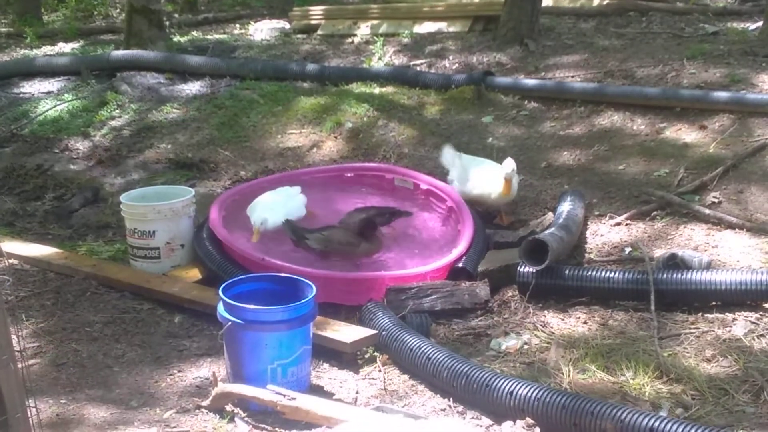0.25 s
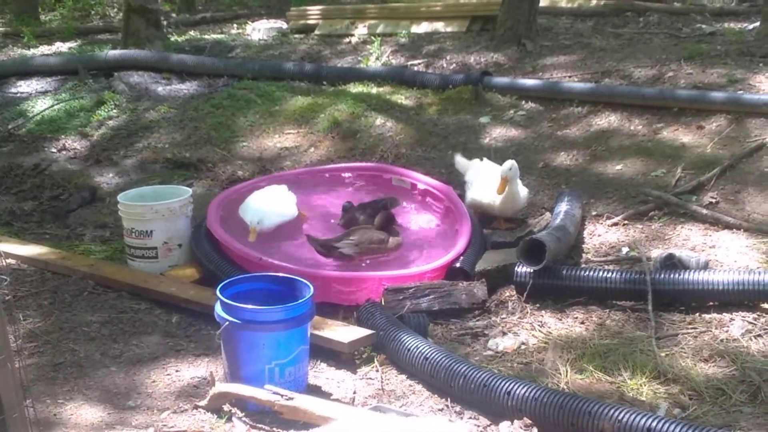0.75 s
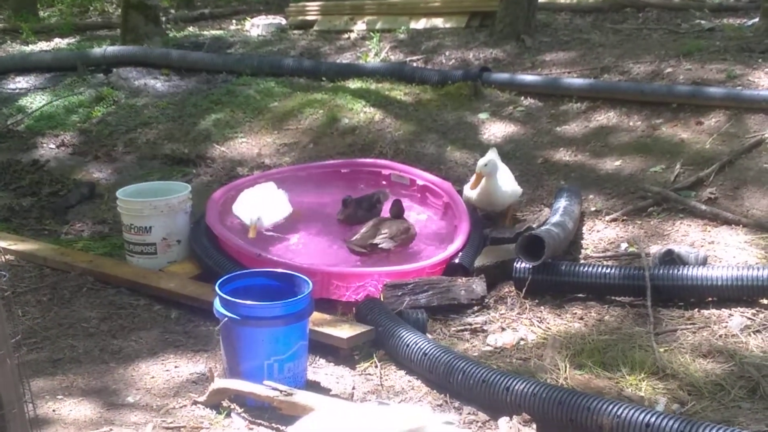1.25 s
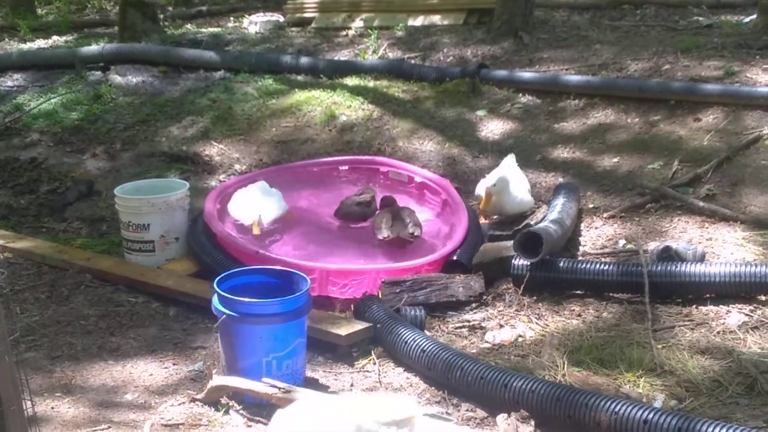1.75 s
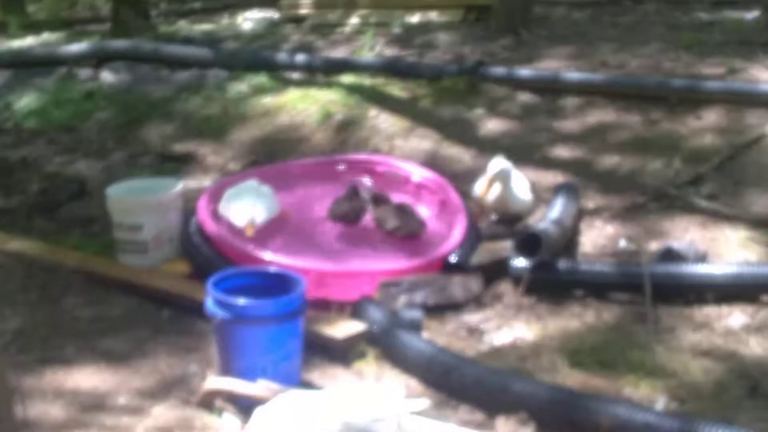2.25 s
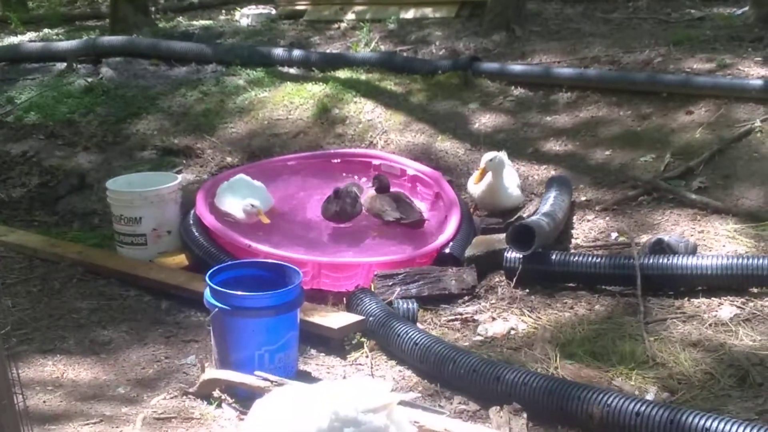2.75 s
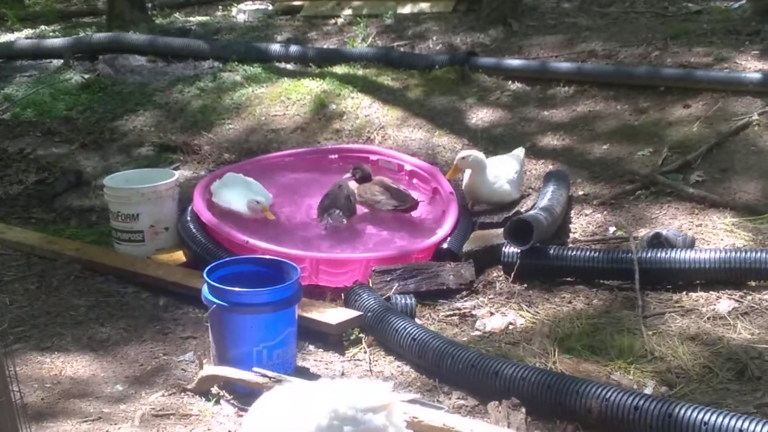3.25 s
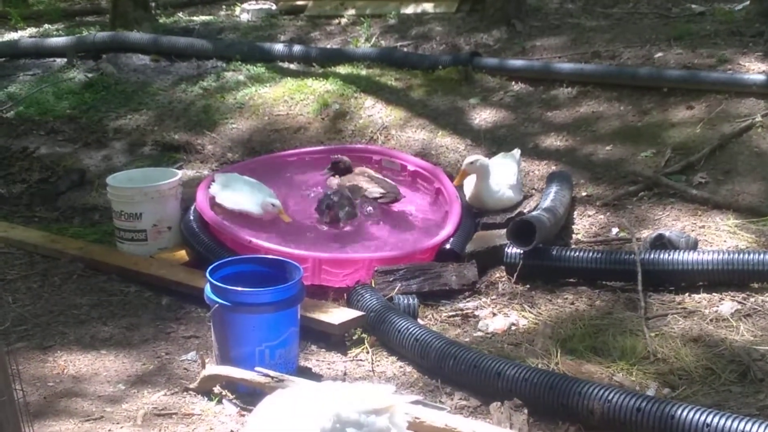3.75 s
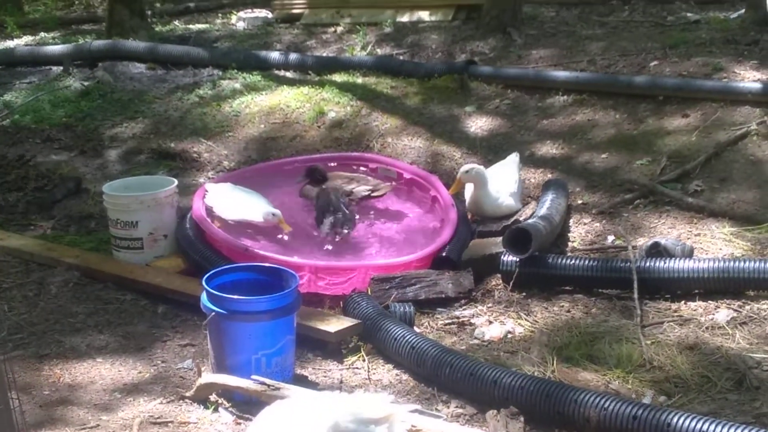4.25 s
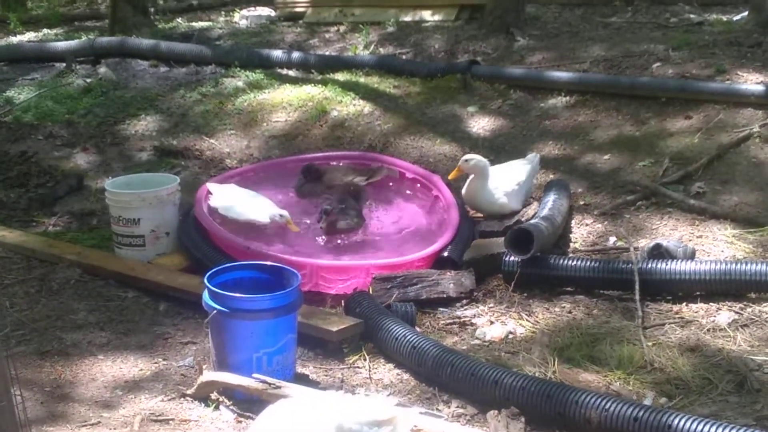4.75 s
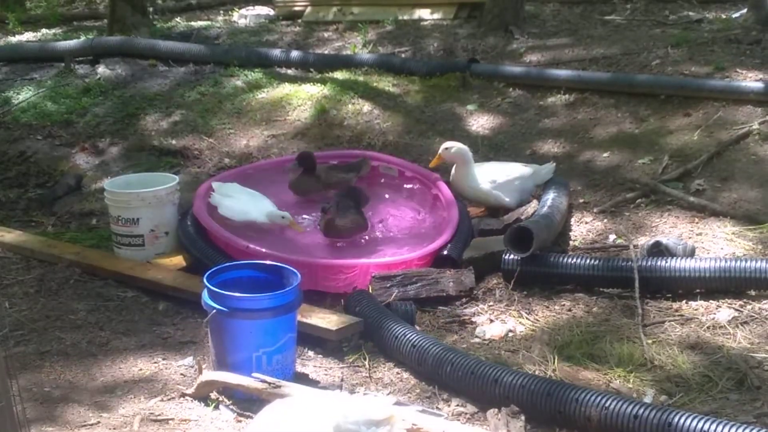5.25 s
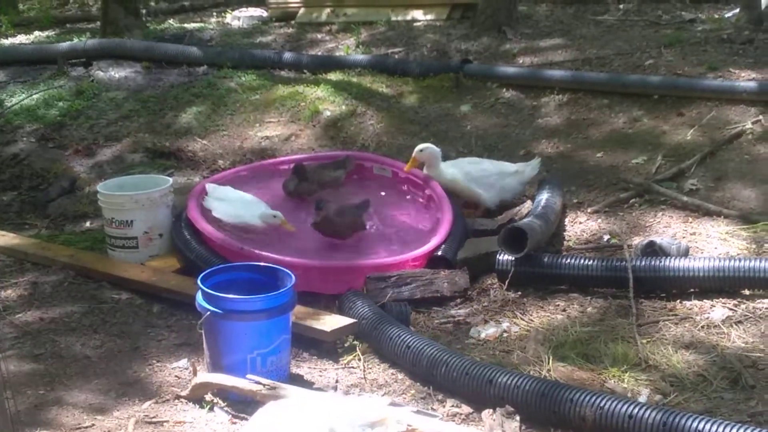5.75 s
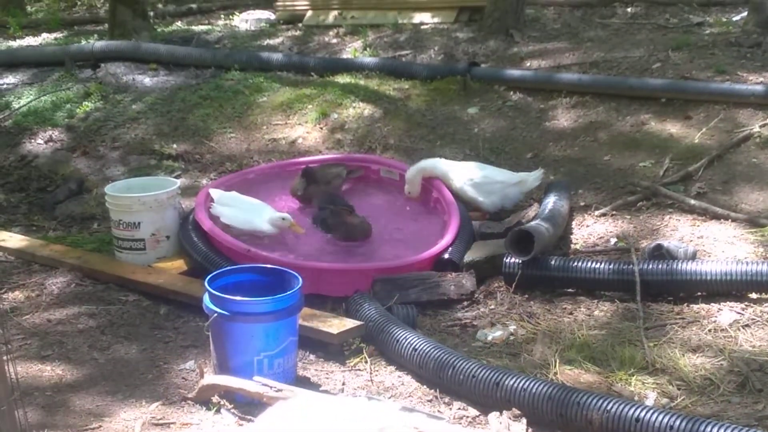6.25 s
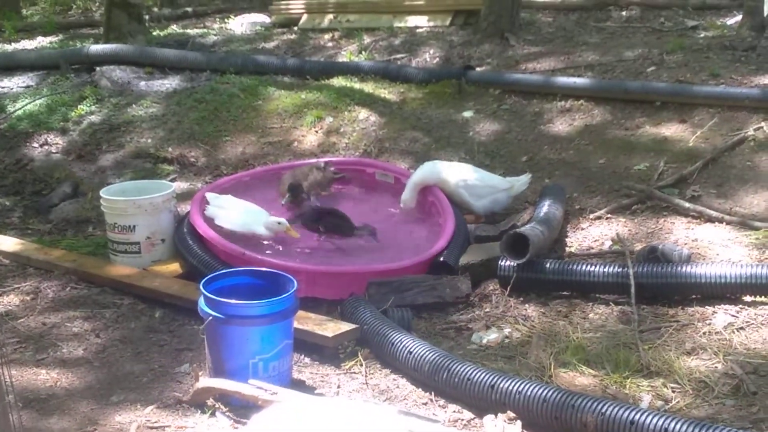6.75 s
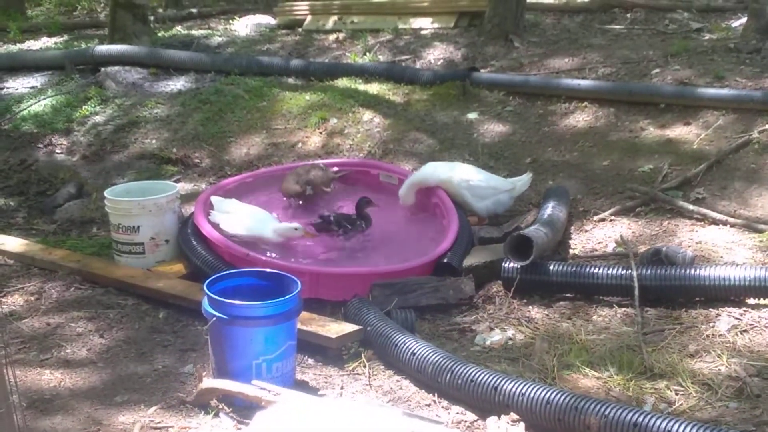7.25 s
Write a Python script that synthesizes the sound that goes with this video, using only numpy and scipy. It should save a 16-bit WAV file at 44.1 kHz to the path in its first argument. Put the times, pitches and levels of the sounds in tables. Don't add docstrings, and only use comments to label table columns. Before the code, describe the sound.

Ducks dabble and drip in a plastic pool while low clucks and grumbles mutter around, with two brief sharp squawks and small whistled chirps.

```python
import sys
import numpy as np
from scipy import signal
from scipy.fft import rfft, irfft, next_fast_len
from scipy.io import wavfile
from scipy.ndimage import uniform_filter1d, map_coordinates

SR = 44100
rng = np.random.default_rng(int(sys.argv[2]) if len(sys.argv) > 2 else 0)


def output_pcm(signal):
    pcm = np.clip(np.atleast_2d(signal).T, -1, 1) * 32767
    wavfile.write(sys.argv[1], SR, np.round(pcm).astype(np.int16))


def decibels_to_gain(level_db):
    exponent = np.asarray(level_db, float) / 20
    return 10 ** exponent


N = 331632


def unit(x):
    return x / np.sqrt(np.mean(x ** 2) + 1e-20)


def along(points, hz):
    f, v = np.transpose(points)
    return np.interp(np.log(hz + 1), np.log(f + 1), v)


def wobble(rate_hz):
    return map_coordinates(rng.standard_normal(int(N * rate_hz / SR) + 4), [np.arange(N) * rate_hz / SR])


def filtered(x, response):
    m = next_fast_len(N + SR // 2)
    return irfft(rfft(x, m) * response(np.fft.rfftfreq(m, 1 / SR)), m)[..., :N]


def resonances(modes, f):
    total = 0
    for k, (centre, width, db) in enumerate(modes):
        mode = 1j * f * width / (centre * centre - f * f + 1j * f * width)
        total = total + (-1) ** k * decibels_to_gain(db) * mode
    return total


def add(track, s, sound):
    part = track[round(s * SR):][:len(sound)]
    part += sound[:len(part)]


def stack(pitch_hz, modes, rough, count=8):
    shake = uniform_filter1d(rng.standard_normal((2, len(pitch_hz))), size=40) * 6
    phase = 2 * np.pi * np.cumsum(pitch_hz * (1 + 0.3 * rough * shake[0])) / SR
    voice = 0
    for k in range(1, count + 1):
        gain = np.abs(resonances(modes, k * pitch_hz))
        voice = voice + gain * np.sin(k * phase + (k - 1) ** 2)
    return voice * (1 + rough * shake[1])


def placed(x, lag_s):
    return filtered(x, lambda f: np.exp(-1j * np.pi * f * lag_s * np.array([[1], [-1]])))


# (frequency [Hz], first port louder [dB], first port late [rad])
SHADE = [(850, 0, .7), (1600, -4, 1.65), (2450, -4, .15), (3000, 9, .9), (3500, 4.5, 1.4), (4500, 0, 2.4),
         (5500, 0, 2.6)]


def shaded(x):
    hz, louder_db, late_rad = np.transpose(SHADE)
    sign = np.array([[.5], [-.5]])

    def response(f):
        gain = decibels_to_gain(sign * np.interp(f, hz, louder_db))
        turn = np.exp(-1j * sign * np.interp(f, [0, *hz], [0, *late_rad]))
        return gain * turn / (1 + (f / 5200) ** 8)
    return filtered(x, response)


# (time [s], pitch [Hz], effort [dB])
SQUAWKS = [
    [(2.233, 619, -50), (2.243, 735, -30), (2.252, 785, -17.5), (2.2548, 820, -22), (2.2582, 862, -15),
     (2.2612, 915, -25), (2.266, 1034, -14), (2.269, 1175, -25), (2.279, 1260, -36)],
    [(4.689, 700, -52), (4.693, 720, -36), (4.700, 745, -37), (4.705, 765, -27), (4.714, 870, -25),
     (4.720, 974, -17.5), (4.7245, 1170, -21), (4.732, 1200, -38), (4.745, 1250, -48)],
]
# (frequency [Hz], width [Hz], level [dB])
THROATS = [
    [(910, 190, -12), (1600, 290, 3)],
    [(890, 130, -19), (1670, 870, -5)],
]
# (frequency [Hz], width [Hz], level [dB])
BEAK = [(2900, 870, -16.5), (4260, 670, -35)]
GAPE = [(2830, 1300, -3.5)]
RASP_DB = [-5, -2]
# (frequency [Hz], level [dB])
HELD = [(900, -36), (900, -22)]
GAPE_HZ, GAPE_SPAN_HZ = 943, 21
BRIGHTENS, HELD_FOLLOWS = 0.24, 0.86


def squawks():
    out = np.zeros((2, N))
    for call, throat, rasp_db, (held_hz, held_db) in zip(SQUAWKS, THROATS, RASP_DB, HELD):
        s, *cols = np.transpose(call)
        pitch, effort_db = [np.interp(np.arange(s[0], s[-1], 1 / SR), s, c) for c in cols]
        rasp = uniform_filter1d(rng.standard_normal((8, len(pitch))), size=70)
        rasp = uniform_filter1d(rasp, size=70) * 7
        phase = 2 * np.pi * np.cumsum(pitch * (1 + 0.015 * rasp[0])) / SR

        gape = 1 / (1 + np.exp((GAPE_HZ - pitch) / GAPE_SPAN_HZ))
        drive, flick = decibels_to_gain(effort_db) * (1 - gape), decibels_to_gain(effort_db) * gape
        below_peak_db = effort_db - effort_db.max()
        bright = decibels_to_gain(BRIGHTENS * below_peak_db)

        tone = 0
        for k in range(1, 8):
            modes = throat if k < 4 else BEAK
            gain = drive * bright ** min(k - 1, 1) * np.abs(resonances(modes, k * pitch))
            gain = gain + flick * np.abs(resonances(GAPE, k * pitch)) ** 2
            tone = tone + gain * (1 + .045 * k * rasp[k]) * np.sin(k * phase + k * k)
        voice = np.zeros(N)
        add(voice, s[0], tone)

        held = decibels_to_gain(held_db + HELD_FOLLOWS * below_peak_db) * (1 - gape)
        add(voice, s[0], held * np.sin(2 * np.pi * held_hz * np.cumsum(1 + 0.044 * rasp[1]) / SR))

        breath = np.zeros(N)
        add(breath, s[0], drive * bright * (1 + np.cos(phase)) * rng.standard_normal(len(pitch)))
        voice += decibels_to_gain(rasp_db) * filtered(breath, lambda f: resonances([(1900, 1800, 0)], f) ** 2)
        out += shaded(voice)
    return out


# (time [s], length [s], top pitch [Hz], level [dB], roughness [0-1])
GRUMBLES = [(0.564, 0.1, 327.7, -55, 0.61), (0.907, 0.089, 300, -61.5, 0.7), (1.08, 0.043, 283, -60, 0.46),
            (1.204, 0.051, 300, -59.5, 0.8), (1.456, 0.046, 334, -50.5, 0.49),
            (1.745, 0.061, 300, -52.5, 0.8), (2.705, 0.04, 329.5, -41.5, 0.3),
            (3.498, 0.084, 300, -49, .56), (3.653, 0.037, 300.8, -45, 0.38),
            (4.526, 0.023, 273, -53.5, 0.4), (4.748, 0.02, 313, -41, 0.3), (5.116, 0.067, 330, -43, 0.34),
            (5.629, 0.058, 300, -51.5, 0.75), (6.04, 0.053, 331.3, -48, 0.7),
            (6.17, 0.25, 261.3, -54.5, 0.54)]
HOOT = (3.965, .05, 326, -43, .15)
# (frequency [Hz], width [Hz], level [dB])
CHEST = [(300, 20, -2), (631, 62, -13.5), (826, 135, -1), (1290, 180, -47)]
ARCH, HOOT_ARCH = 0.088, .45


def grumbles():
    out = np.zeros(N)
    rows = [(*row, ARCH) for row in GRUMBLES] + [(*HOOT, HOOT_ARCH)]
    for s, length_s, top_hz, db, rough, arch in rows:
        u = np.linspace(-1, 1, int(length_s * SR))
        voice = stack(top_hz * (1 - arch * u * u), CHEST, np.clip(rough, 0, 1), count=6)
        add(out, s, decibels_to_gain(db) * np.sqrt(1 - u ** 4) * voice)
    return out


# (time [s], peak level [dB], knock level [dB])
CLUCKS = [(1.366, -55.5, 8), (2.127, -46.5, 9.5), (2.667, -45, 3), (2.85, -44.5, 3.5), (3.073, -48.5, -7),
          (3.34, -48, -1), (3.61, -57, 14), (3.881, -43.5, -1), (4.019, -50, -1), (4.435, -49, 6.5),
          (4.547, -47, 8), (5.018, -44.5, 0), (5.191, -44.5, 4), (5.484, -46.5, 5.5), (5.992, -47.5, -2),
          (6.194, -46.5, 7.5), (6.457, -45.5, 8), (6.827, -57, 6), (7.085, -48.5, 1), (7.436, -48.5, 7.5),
          (7.478, -62, 17.5), (7.512, -57, 0)]
# (time [s], peak level [dB], pitch [Hz], knock level [dB])
BOOMS = [
    (.554, -51.5, 377, -15),
    (1.184, -44, 240, -7.5),
    (2.492, -43, 249, 0.5),
    (3.492, -38.5, 179.4, -2.5),
    (3.664, -35, 178.6, -5),
    (3.954, -48, 305, -12),
    (4.758, -39, 206, -26),
    (5.627, -37.5, 329, -1),
    (6.281, -44, 299, -20),
    (6.332, -39, 267, -28),
]
CLUCK_HZ, CLUCK_SCATTER, FAR_CLUCKS = 291.8, 0.055, 9


def clucks():
    out, t = np.zeros(N), np.arange(SR // 16) / SR
    near = [(s, db, CLUCK_HZ * (1 + CLUCK_SCATTER * rng.standard_normal()), knock_db)
            for s, db, knock_db in CLUCKS]
    far = rng.random((FAR_CLUCKS, 4)) * [6.6, 5, 140, 6] + [.8, -64, 220, -16]
    low_fade = decibels_to_gain(-60 * t / .09) * (1 - np.exp(-(t / .0055) ** 2))
    knock_fade = decibels_to_gain(-60 * t / 0.088) * (1 - np.exp(-t / 0.00017))
    for s, db, hz, knock_db in np.vstack([near, BOOMS, far]):
        low = np.sin(2 * np.pi * hz * t * (1 - 3 * t)) * low_fade
        knock = stack(hz + 0 * t, [(840, 184, 0.0), (1300, 1200, -6.5)], rough=0.34) * knock_fade
        add(out, s, decibels_to_gain(db + 8.0) * (low + decibels_to_gain(knock_db - 15.5) * knock))
    return out


# (start [s], first crest [s], last crest [s], crest pitch [Hz], level [dB])
WARBLES = [
    (2.682, 2.769, 2.769, 1750, -51),
    (3.558, 3.584, 3.69, 1620, -47),
    (5.212, 5.243, 5.315, 1650, -54),
    (6.085, 6.108, 6.108, 1700, -51),
    (6.2, 6.219, 6.219, 1750, -49),
]
# (time [s], length [s], middle pitch [Hz], glide [share of pitch], level [dB])
CHIRPS = [(1.371, 0.038, 1500, .5, -61), (1.392, .024, 2500, 0.065, -59), (1.407, .03, 1390, -.75, -54),
          (1.583, 0.052, 3240, 0.015, -54), (2.163, .02, 860, -0.35, -50.5), (2.809, 0.02, 1840, 0.62, -47),
          (2.82, 0.038, 1363, -.8, -54), (2.857, 0.015, 1840, 0.64, -47.5),
          (2.905, 0.0157, 987, -0.32, -54.5), (3.455, 0.019, 1104, 0.29, -52),
          (3.496, 0.023, 1300, 0.029, -45), (3.525, 0.037, 1430, 0.097, -40.5),
          (3.922, 0.0093, 970, -0.61, -53), (4.186, 0.018, 1545, 0.041, -49),
          (5.02, 0.009, 1780, .35, -43.5), (5.142, .026, 2190, 0.85, -42.5), (5.162, .028, 1324, 0.35, -49),
          (5.253, 0.018, 1575, -0.2, -44), (5.354, .016, 1570, .2, -56), (5.556, 0.0091, 2730, .18, -49),
          (5.627, 0.032, 494, -0.036, -41), (5.997, 0.024, 2500, .2, -49),
          (6.443, 0.0085, 1723, 0.24, -37.5), (6.669, 0.072, 1600, -.06, -57),
          (6.922, .021, 1585, 0.29, -54.5), (7.461, .04, 4900, -.03, -52)]
RISE_S, FALL_S, BREAK_S = 0.024, 0.021, 0.0037
HOLD_DB, RISE_DB, DIP_DB, SWELL_DB = -5, -1, 1, 4.5
TROUGH_HZ, BEAT_S = 1320, .055
HURRY, OVERSHOOT = .9, 1.01


def strokes():
    rows = [(s, length_s, hz * (1 - glide / 2), hz, hz * (1 + glide / 2), db)
            for s, length_s, hz, glide, db in CHIRPS]
    low = TROUGH_HZ
    for start, first, last, high, db in WARBLES:
        half, lift = (low + high) / 2, first - RISE_S - BREAK_S
        dips = round((last - first) / BEAT_S)
        crests = first + (last - first) * np.linspace(0, 1, dips + 1) ** HURRY
        if lift - start > RISE_S / 2:
            rows.append((start, lift - start - BREAK_S, low, 1.02 * low, low, db + HOLD_DB))
        rows.append((lift, RISE_S, low, .95 * half, high, db + RISE_DB))
        rows.append((last + BREAK_S, FALL_S, high, half, low, db + RISE_DB))
        for k, (a, b) in enumerate(zip(crests, crests[1:])):
            dip_db = db + DIP_DB + SWELL_DB * k
            rows.append((a + BREAK_S, b - a - BREAK_S, high, low, OVERSHOOT * high, dip_db))
    return rows


def trills():
    out = np.zeros(N)
    for s, length_s, start, middle, end, db in strokes():
        u = np.linspace(0, 1, int(length_s * SR))
        pitch = np.polyval(np.polyfit([0, .5, 1], [start, middle, end], deg=2), u)
        pitch += .3 * (pitch - middle) * (2 * u - 1) ** 6
        swell = np.minimum(1, 6 * np.minimum(u, 3.0 * (1 - u))) * (0.85 + 0.14 * u)
        rough = 0.16 * min(1, (TROUGH_HZ / middle) ** 2)
        add(out, s, decibels_to_gain(db) * swell * stack(pitch, [(1.35 * middle, 1100, 0)], rough, count=1))
    return out


# (start [s], first crest [s], last crest [s], dips [count], level [dB])
SONGS = [
    (.645, .727, .833, 2, -52),
    (1.436, 1.516, 1.671, 3, -52),
]
# (frequency [Hz], width [Hz], level [dB])
GULLET = [(1560, 560, 0)]
LOW_HZ, FIRST_CREST_HZ, LAST_CREST_HZ = 1290, 1950, 2250
POINTED, LATE = 1.9, .08
SONG_SWELL_DB, UPSWING_DB = 2.5, 2
SONG_END = .4
THIN_HZ, THIN_SPAN_HZ, THIN_SHARE = 1900, 150, .8


def songs():
    out = np.zeros(N)
    for start, first, last, dips, db in SONGS:
        beat_s = (last - first) / dips
        t = np.arange(start, last + SONG_END * beat_s, 1 / SR)
        beats = np.maximum((t - first) / beat_s, -.5)
        crest = FIRST_CREST_HZ + (LAST_CREST_HZ - FIRST_CREST_HZ) * np.sqrt(np.clip(beats / dips, 0, 1))
        late_beats = beats - LATE * np.sin(np.pi * beats) ** 2
        swing = np.abs(np.cos(np.pi * late_beats)) ** (2 * POINTED)
        hold = LOW_HZ * (1 + 0.41 * np.maximum(first - beat_s / 2 - t, 0))
        pitch = hold + (crest - LOW_HZ) * swing
        level_db = db + SONG_SWELL_DB * beats - UPSWING_DB * np.sin(2 * np.pi * beats)
        ends = np.minimum(1, np.minimum((t - start) / .015, (t[-1] - t) / .008))
        ends *= 1 - THIN_SHARE * np.exp(-((pitch - THIN_HZ) / THIN_SPAN_HZ) ** 2)
        gullet = np.abs(resonances(GULLET, pitch))
        add(out, start, decibels_to_gain(level_db) * ends * gullet * stack(pitch, GULLET, rough=.13, count=1))
    return out


# (time [s], peak level [dB], frequency [Hz], width [Hz])
SNAPS = [(1.182, -47.5, 990, 900), (2.234, -46, 900, 1000), (3.494, -45, 980, 900), (3.675, -40, 1100, 900),
         (3.681, -35, 1100, 900), (3.883, -48, 990, 900), (4.03, -62, 8500, 3000), (4.44, -58, 1200, 800),
         (4.551, -55, 1100, 900), (4.557, -47, 1090, 900), (4.8883, -35.5, 2200, 2500),
         (4.98, -43, 1400, 600), (5.016, -48, 1300, 1200), (5.628, -46, 3500, 4000),
         (5.679, -45.5, 1200, 700), (5.765, -54, 6000, 5000), (6.1646, -41.5, 1600, 250),
         (6.172, -46, 4500, 5000), (6.462, -42, 1100, 1200), (6.6, -59, 8500, 3000)]


def snaps():
    out, t = np.zeros(N), np.arange(SR // 50) / SR
    f = np.fft.rfftfreq(len(t), 1 / SR)
    for s, db, hz, width_hz in SNAPS:
        blow = rng.standard_normal(len(t)) * np.exp(-t / .0003)
        ring = irfft(rfft(blow) * resonances([(hz, width_hz, 0)], f) ** 3, len(t))
        add(out, s, decibels_to_gain(db) * ring / np.abs(ring).max())
    return out


# (time [s], peak level [dB], frequency
# [Hz])
DRIPS = [(0.7563, -51.5, 3460), (1.7921, -45.5, 3830), (2.1859, -50, 3710), (2.814, -49.5, 2360),
         (3.0677, -50.5, 3280), (3.3226, -40, 2810), (3.4037, -45.5, 2700), (3.4772, -46, 2900),
         (3.5992, -46, 2950), (4.057, -41, 2550), (4.171, -44, 3440), (4.3002, -58, 3500),
         (4.3692, -39.5, 3760), (4.491, -47, 3760), (4.5157, -41.5, 3470), (4.9171, -50, 3500),
         (5.018, -47.5, 3390), (5.035, -46, 3520), (5.2719, -47, 3360), (5.2979, -42.5, 2850),
         (5.3668, -41.5, 3480), (5.3862, -41.5, 2890), (5.4735, -46, 2910), (5.492, -48, 3490),
         (5.5783, -39, 3500), (5.628, -37.5, 2800), (5.695, -50, 3360), (5.732, -42, 2740),
         (5.7638, -40.5, 3450), (6.1657, -45, 2580),
         (4.103, -52, 2640), (4.1934, -48, 3360), (4.309, -46, 3500), (4.334, -52, 2870),
         (4.9296, -48, 3350), (6.2186, -52, 3140), (6.828, -49.5, 3440), (6.8912, -53, 2900),
         (6.9601, -55, 2850), (7.04, -56, 3400), (7.2125, -49, 2480), (7.403, -47.5, 3500),
         (7.5134, -43.5, 3170)]
TICKS = [(0.5756, -48, 3440), (0.601, -46, 3460), (0.7644, -49, 3080), (0.7944, -59, 3040),
         (1.7764, -49, 3700), (3.4989, -43, 2970), (3.7574, -62, 3430), (4.0527, -45, 2630),
         (4.3614, -42, 3560), (4.4353, -44, 3630), (4.5354, -46, 3500), (4.9616, -43, 2850),
         (5.1228, -48, 2940), (5.235, -47, 3280), (5.9184, -54, 3420), (5.9594, -56, 2920),
         (6.0746, -44, 2450), (6.134, -41, 2530), (6.2672, -47, 3430), (6.2961, -48, 3600),
         (6.3315, -53, 3360), (6.4028, -52, 3040)]
# (frequency [Hz], width [Hz], level [dB])
PLASTIC = [(2500, 760, 5), (3500, 580, 6), (5770, 2700, -6.5)]
TICK_DB = -6.5


def drips():
    out, t = np.zeros((2, N)), np.arange(SR // 60) / SR
    faint = rng.random((330, 3)) * [3.4, 10, 1400] + [3.2, -67, 2500]
    splash = rng.random((24, 3)) * [.07, 7, 900] + [.555, -61, 2900]
    stray = rng.random((26, 3)) * [3.1, 8, 1200] + [3.3, -60, 2450]
    drops = np.vstack([DRIPS, np.add(TICKS, [0, TICK_DB, 0]), faint, splash, stray])
    f = np.fft.rfftfreq(len(t), 1 / SR)
    wall = sum(resonances([mode], f) ** 2 for mode in PLASTIC)
    for (s, db, hz), (rise, life, side) in zip(drops, rng.random((len(drops), 3))):
        age = t / (.0012 + .001 * life)
        fade = np.e * age * np.exp(-age)
        bubble = np.sin(2 * np.pi * hz * t * (.96 + 13 * rise * t))
        smack = irfft(rfft(rng.standard_normal(len(t)) * fade) * wall, len(t))
        drop = fade * bubble + .9 * smack
        drop *= decibels_to_gain(db) / np.abs(drop).max()
        for port, lag_s in enumerate([0, .00003 * (2 * side - .5)]):
            add(out[port], s - .001 + lag_s, drop)
    return out


# (frequency [Hz], t60 [s])
PEN = [(300, 0.14), (1600, 0.38), (3500, 0.86), (8000, 0.052)]


def pen(x):
    hz, t, z = signal.stft(rng.standard_normal((2, SR // 2)), SR, nperseg=256)
    tail = signal.istft(z * decibels_to_gain(-60 * t / along(PEN, hz)[:, None]), SR, nperseg=256)[1]
    tail = tail / np.linalg.norm(tail[0])
    return signal.fftconvolve(np.pad(x, (400, 0))[None], tail, axes=1)[:, :N]


# (frequency [Hz], density [dB per Hz])
ALIKE = [(30, -6.5), (65, -1), (110, 0.5), (200, 1), (400, -7.5), (800, -12.5), (1600, -22), (2800, -26.5),
         (3700, -25), (4600, -33), (7000, -37.5), (10000, -34), (13500, -38)]
UNLIKE = [(30, -2), (65, -1), (110, -7), (200, -13.5), (400, -15.5), (800, -18), (1600, -19.5), (2800, -29),
          (3700, -25), (4600, -31.5), (7000, -38.5), (10000, -34), (13500, -33)]


def layer(lo_hz, hi_hz, patchy_db):
    z = signal.stft(rng.standard_normal((2, N)), nperseg=512)[2]
    field = uniform_filter1d(rng.standard_normal(z.shape[1:]), size=5, axis=0)
    field = uniform_filter1d(field, size=8, axis=1)
    pair = signal.istft(z * decibels_to_gain(patchy_db * unit(field)), nperseg=512)[1][:, :N]

    def response(f):
        band = 1 / np.sqrt((1 + (lo_hz / (f + 1)) ** 6) * (1 + (f / hi_hz) ** 6))
        return band * decibels_to_gain(np.array([along(ALIKE, f), along(UNLIKE, f)]))
    both, apart = filtered(pair, response)
    return unit(np.array([both + apart, both - apart]))


# (time [s], stir of the flock [dB], stir of the pool [dB])
YARD = [
    (0.0, -62, -64.5),
    (0.67, -59, -53),
    (1.949, -59.5, -56),
    (2.6, -56, -49),
    (4.88, -55.5, -48),
    (5.85, -56, -49),
    (6.2, -55.5, -52.5),
    (6.8, -56.5, -51),
    (7.52, -60, -52.5),
]
# (time [s], level [dB])
WIND = [
    (0.0, -80),
    (0.17, -70),
    (2.96, -70),
    (3.035, -56),
    (3.1, -69),
    (7.41, -69),
    (7.52, -68),
]
# (frequency [Hz], level [dB])
WHINE = [(6998, -100), (9001, -101), (11999, -109), (13001, -100), (14002, -101)]
HISS_FOLLOWS = 0.77


def yard():
    s, *cols = np.transpose(YARD)
    t = np.arange(N) / SR
    flock_db, water_db = [np.interp(t, s, c) for c in cols]
    hiss_db = HISS_FOLLOWS * (flock_db - flock_db.mean()) - 75.0
    wind_db = np.interp(t, *np.transpose(WIND))
    wind = decibels_to_gain(wind_db + 15 + 0.75 * wobble(8.1)) * layer(50, 70.4, patchy_db=1.5) * [[1], [.8]]
    flock = decibels_to_gain(flock_db + 1.0 + 0.77 * wobble(17)) * layer(98, 2900, patchy_db=3.5)
    water = decibels_to_gain(water_db - 12.0 + 0.63 * wobble(23)) * layer(1970, 3180, patchy_db=3.5)
    hiss = decibels_to_gain(hiss_db + 4.5 + wobble(8.3)) * layer(3120, 8400, patchy_db=2.3)
    whine = sum(decibels_to_gain(db + 8) * np.sin(2 * np.pi * hz * t) for hz, db in WHINE) * [[1], [.3]]
    return wind + flock + water + hiss + whine


# (delay [s], level [dB])
WALLS = [(.012, -23.5), (.020, -30), (.046, -27)]
# (frequency [Hz], width [Hz], level [dB])
WALL_COLOUR = [(1700, 2100, 1.5), (3600, 500, 1)]


def wall_echoes(hen):
    walls = sum(decibels_to_gain(db) * np.roll(hen[::(-1) ** k], round(s * SR), axis=1)
                for k, (s, db) in enumerate(WALLS))
    return filtered(walls, lambda f: resonances(WALL_COLOUR, f))


def scene():
    hen, water = squawks(), drips()
    young = trills() + songs()
    low = grumbles() + clucks() + snaps()
    near = hen + water + placed(low, .00009)
    near += placed(young, 0.00012) * decibels_to_gain(np.array([[-1.5], [1.5]]))
    far_hen = filtered(hen[0], lambda f: 1 / (1 + (f / 2700) ** 4))
    echoes = decibels_to_gain(-20) * pen(far_hen + young + low + water[0])
    return near + wall_echoes(hen) + echoes + yard()


def roll_off(x):
    return signal.sosfilt(signal.butter(12, 14200, fs=SR, output="sos"), x)


def record(dry):
    cross_s, top_hz = 21 / 44100, 14180

    def feed(f):
        return .76 / np.sqrt(1 + (f / 8000) ** 2) * np.exp(-2j * np.pi * f * cross_s)
    wide = filtered(dry - filtered(dry[::-1], feed), lambda f: f < top_hz)
    return roll_off(wide)


dry = scene()
out = record(dry)
output_pcm(out)
```